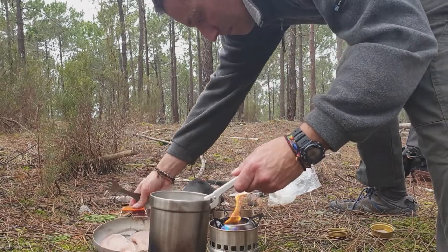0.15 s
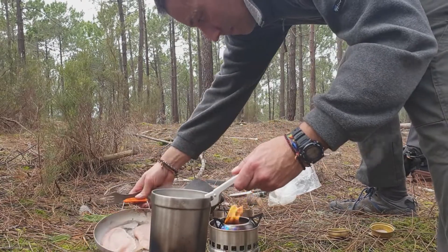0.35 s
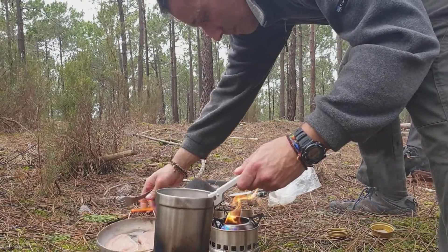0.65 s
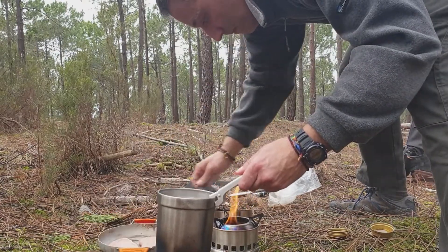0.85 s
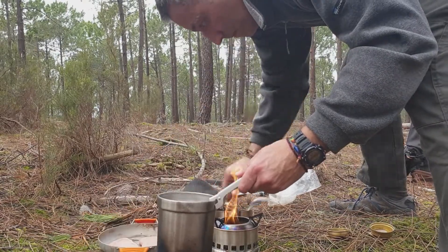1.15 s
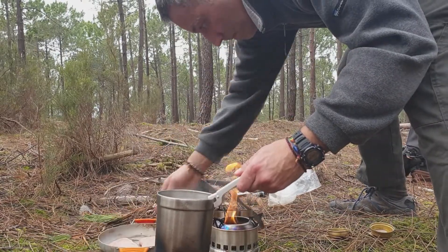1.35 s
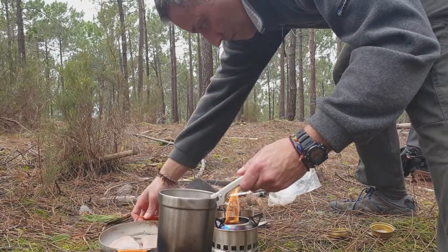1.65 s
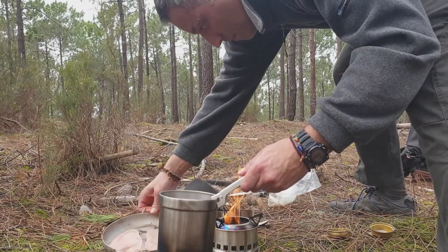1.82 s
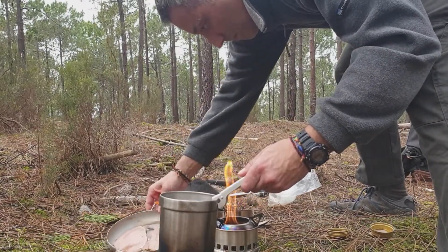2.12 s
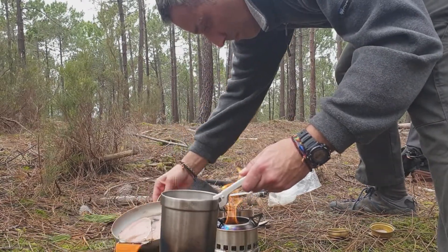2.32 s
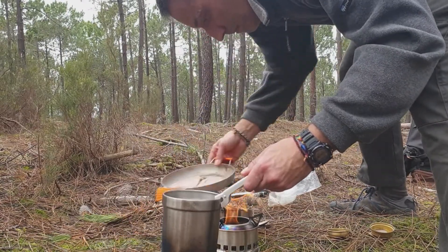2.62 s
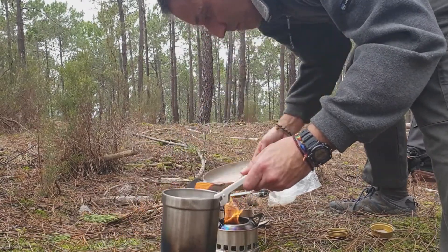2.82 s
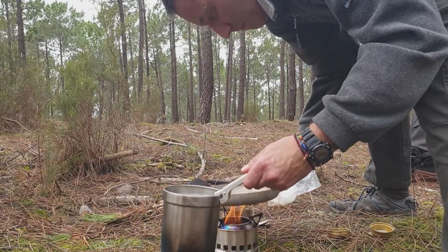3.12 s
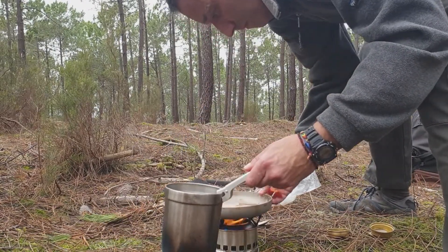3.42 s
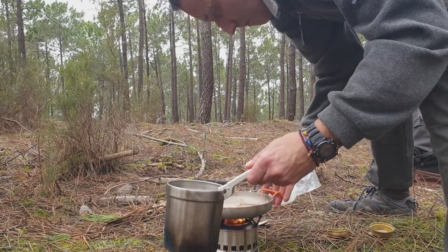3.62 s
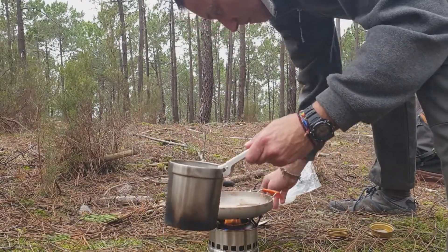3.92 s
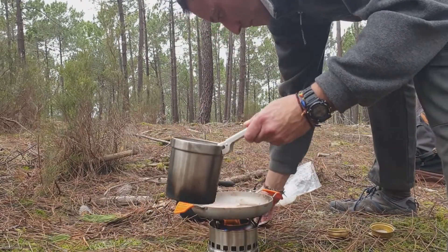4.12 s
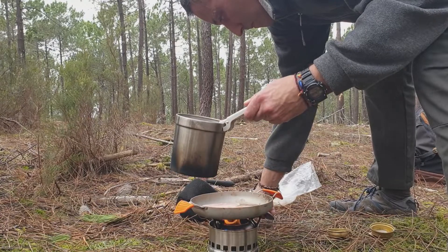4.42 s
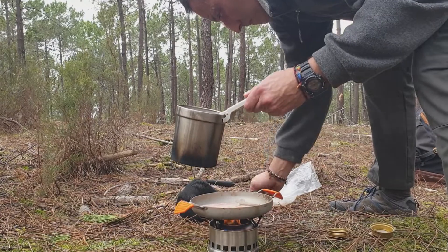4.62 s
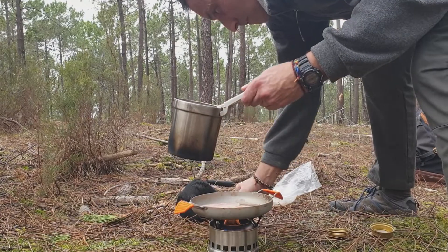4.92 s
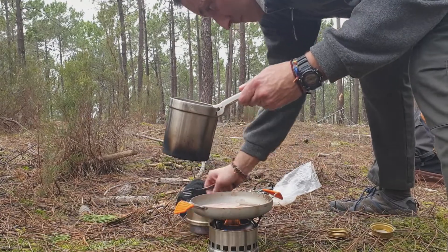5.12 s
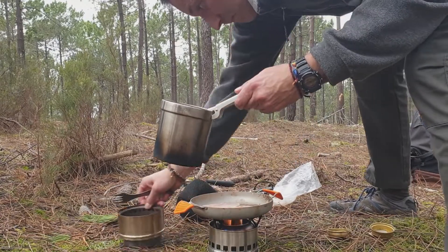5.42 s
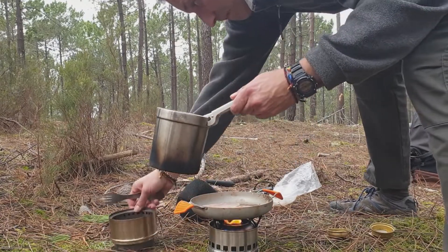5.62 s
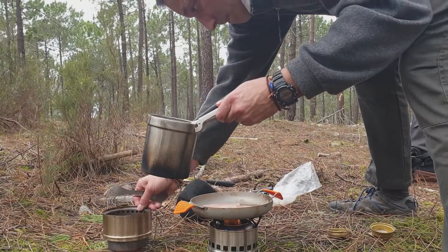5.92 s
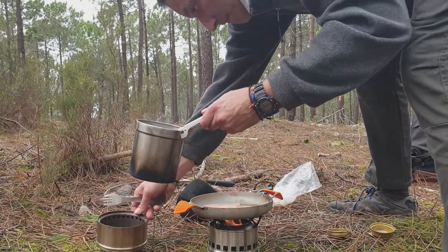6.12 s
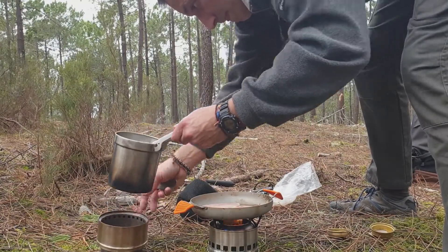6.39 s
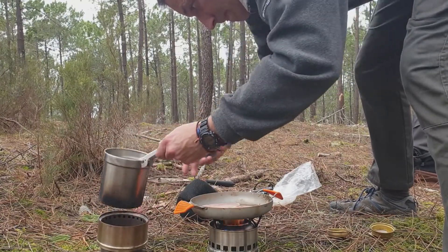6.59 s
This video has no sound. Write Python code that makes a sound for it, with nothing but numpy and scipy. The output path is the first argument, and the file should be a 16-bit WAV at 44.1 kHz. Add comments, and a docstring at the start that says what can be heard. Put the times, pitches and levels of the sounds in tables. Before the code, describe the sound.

Close outdoor stereo pickup of camp cookware being handled. Faint plastic ticks come first, then a sharper click, a bright lid clank with rattling scrape, and a quiet pause. A pan lands on a burner in a quick dry clatter. After another pause, a steel vessel is scraped and struck in the loudest clang, with smaller knocks following. Low wind rumbles throughout, with faint hiss.

```python
"""Thin metal camping ware is handled on a forest floor, a metre from two microphones: a plastic handle ticks,
a lid is set down, a pan lands on the burner, a steel stove shell is dragged and knocked. Each piece rings in
its own decaying modes, driven by single knocks and by noisy grit that rubs and skids. Soft thumps of filtered
noise come through the ground; wind, a low coloured noise, rumbles steadily over the microphones' own hiss."""
import sys
import numpy as np
from scipy import signal
from scipy.fft import rfft, irfft
from scipy.io import wavfile
from scipy.ndimage import uniform_filter1d

SR = 44100
rng = np.random.default_rng(int(sys.argv[2]) if len(sys.argv) > 2 else 0)


def invert_db(level):
    """Linear amplitude ratio for a level in decibels (20 dB per decade), elementwise."""
    return 10 ** (np.asarray(level, dtype=float) / 20)


def store_wav(level_fs):
    """Save 16-bit WAV to argv[1]."""
    pcm = np.round(np.clip(np.atleast_2d(level_fs), -1, 1) * 32767)
    wavfile.write(sys.argv[1], SR, pcm.T.astype(np.int16))


N = 297675  # length in samples
SIDES = np.array([[1], [-1]])  # left, right
TAIL = np.arange(SR // 4) / SR  # time axis of one ring [s]


def at(points, hz):
    """A spectrum read on a log-frequency axis."""
    f, db = np.transpose(points)
    return np.interp(np.log(np.maximum(hz, 1)), np.log(f), db, left=-90, right=-90)


def colour(x, gain):
    """Filter by a gain given as a function of Hz."""
    return irfft(rfft(x) * gain(np.fft.rfftfreq(x.shape[-1], 1 / SR)), x.shape[-1])


def band(x, lo_hz, hi_hz):
    """Causal band-pass."""
    return signal.sosfilt(signal.butter(3, (lo_hz, hi_hz), "bandpass", fs=SR, output="sos"), x)


def unit(x):
    """Scale to rms 1."""
    return x / np.sqrt(np.mean(x ** 2))


def walk(rate):
    """Random levels, a new one each 1 / rate s, smoothed twice into slow slides."""
    hold = int(SR / rate)
    steps = np.repeat(rng.standard_normal(N // hold + 1), hold)
    return 0.95 * uniform_filter1d(uniform_filter1d(steps, hold), hold)[:N]


# spectrum of the wind: (frequency [Hz], relative density [dB per Hz])
WIND = [(11, -60), (18, -25), (25, -2), (37, -5.5), (54, 1), (70, 0.5), (120, -6), (167, -9), (248, -15.5),
        (352, -26.5), (489, -35), (589, -42.5), (695, -44), (2500, -58.5), (3250, -89.5), (5500, -120)]
# the part unlike left and right: (frequency [Hz], level against the shared part [dB])
WIND_UNLIKE = [(25, -20.5), (125, -16), (400, -4.5), (2000, 4.5)]
# slow swell under the flutter: (time [s], level [dB])
GUST = [(0, -47.5), (2.5, -47.5), (3.5, -47), (5, -46), (6.75, -46.5)]


def wind():
    """Low turbulence, nearly the same at both microphones, swelling slowly with a light flutter."""
    same, other = rng.standard_normal((2, N))
    same = colour(same, lambda f: invert_db(at(WIND, f)))
    other = colour(other, lambda f: invert_db(at(WIND, f) + at(WIND_UNLIKE, np.clip(f, 30, 1900))))
    swell_db = np.interp(np.arange(N) / SR, *np.transpose(GUST))
    flutter_db = .8 * walk(6)
    return unit(same + SIDES * other) * invert_db(swell_db + flutter_db)


# spectrum of the hiss: (frequency [Hz], relative density [dB per Hz])
HISS = [(880, -30), (1500, -5), (2290, -10), (3020, -5.5), (6450, -12.5), (7400, -10.5), (8330, -18),
        (11500, -6), (14900, -7), (15800, -12)]


def hiss():
    """Smooth air and electronics noise, unrelated left and right."""
    middle, side = (colour(rng.standard_normal(N), lambda f: invert_db(at(HISS, f))) for _ in range(2))
    return unit(middle + 0.98 * SIDES * side) * invert_db(-81)


def mode_bank(modes, free):
    """One decaying complex turn for each mode; a firmer grip (lower free) shortens them all."""
    hz, db, t60 = np.transpose(modes)[:, :, None]
    return invert_db(db) * np.exp((2j * np.pi * hz - np.log(1000) / (t60 * free)) * TAIL)


def ring(modes, bank, gain_db, spread=0.93):
    """The modes at two microphones; higher ones arrive further out of step."""
    hz = np.transpose(modes)[0]
    skew = spread * np.minimum(hz / 10000, 1) ** 1.2 * rng.standard_normal(len(hz))
    sign = (-1.) ** np.arange(len(hz))  # neighbours start in opposite directions, so no thud lies below them
    return ((sign * invert_db(gain_db) * np.exp(1j * SIDES * skew)) @ bank).imag


def sheen(t60, side_gain):
    """The crowd of upper modes too dense to count: a noise that dies fast, almost unrelated left and right."""
    middle, side = rng.standard_normal((2, len(TAIL)))
    return (middle + side_gain * SIDES * side) * invert_db(-60 * TAIL / t60)


def knocks(modes, table, low_hz, crack_db, crack_t60, chatter_t60=0.0058):
    """Every blow chatters briefly, rings the modes near its favoured pitch most and adds a crack of like colour."""
    out = np.zeros((2, N + SR))
    mode_hz = np.transpose(modes)[0]
    for s, peak_db, spot_hz, free, pan_db in table:
        free = max(free, .03)
        octaves = lambda hz: np.abs(np.log2(np.maximum(hz, 1) / spot_hz))
        off = octaves(mode_hz)
        # a 13 dB lift within some .06 octave of the spot, and 7 dB lost per octave away
        near_db = 13 * np.exp(-(off / .06) ** 2) - 7 * off
        tone = ring(modes, mode_bank(modes, min(free, 1.5)), near_db)

        click = TAIL == 0
        chatter = click + 0.044 * rng.standard_normal(len(TAIL)) * invert_db(-60 * TAIL / chatter_t60)
        tone = signal.fftconvolve(tone, chatter[None], axes=1)[:, :len(TAIL)]

        crack = colour(sheen(crack_t60 * free, 0.89), lambda f: invert_db(-4.5 * octaves(f)))
        crack = band(crack, low_hz, 22000)

        blow = tone / abs(tone).max() + invert_db(crack_db) * crack / abs(crack).max()
        blow = blow * np.cos(np.pi / 2 * TAIL / TAIL[-1])  # fade to silence by the end
        i = int(s * SR)
        out[:, i:i + len(TAIL)] += invert_db(peak_db + SIDES * pan_db / 2) * blow / abs(blow).max()
    return out[:, :N]


# the skid after a knock, by piece: (level against the peak [dB], t60 when free [s],
# fineness at 2 kHz [dB], fineness per octave of the spot [dB])
SKIDS = dict(handle=(-28, 0.33, -8, 10), lid=(-29.5, 0.56, -2, 6.5), pan=(-15, 0.41, 0.5, 12.5),
         shell=(-29.5, 0.05, -9.5, 26))


def skids(table, name):
    """After each knock the piece skids to rest, longer when loosely held, finer when struck at a bright spot."""
    under_db, t60, fine_db, per_octave_db = SKIDS[name]
    strokes = []
    for s, peak_db, spot_hz, free, _ in table:
        finest_db = fine_db + per_octave_db * np.log2(spot_hz / 2000)
        start_db = peak_db + under_db - max(finest_db, 0)
        strokes.append([(s, start_db, finest_db), (s + t60 * free, start_db - 60, finest_db)])
    return strokes


# edges of the pitch ranges that the grades of grit drive, by piece: (frequency [Hz], ..)
RUB_EDGES = dict(handle=(600, 3000, 7500, 16000), lid=(550, 1000, 1600, 3000, 7500, 16000),
             pan=(700, 2500, 4500, 8000, 16000), shell=(600, 1600, 2300, 3100, 7500, 16000))
# grades of grit, coarse to fine, by piece: (level [dB], share of the fineness taken up [0-1])
GRADES = dict(handle=[(-0.5, 0), (-3, 0.77), (1, 0.88)], lid=[(-19.5, 0.48), (-14.5, 0.7), (-5, 0.067),
          (-0.5, 0.42), (0.5, 1)], pan=[(-4.5, 0), (-7, 0.073), (0.5, 0.56), (-1.5, 0.88)],
          shell=[(-16, 0.18), (-4.5, 0), (-5.5, 0.47), (0, .6), (3, 1)])


def rubbing(modes, strokes, name, sheen_db, sheen_t60, free, pan_db,
            grain_db=2.0, shift_db=10.0, dwell_s=.03, patchy_db=2.0):
    """Grades of grit drive the modes and the sheen; the contact slides, so their balance keeps changing."""
    rows, edges = np.concatenate(strokes), RUB_EDGES[name]
    first, last = int(rows[:, 0].min() * SR), int(rows[:, 0].max() * SR)
    length = last - first

    force = np.zeros((len(sheen_db), length))
    for stroke in strokes:
        s, coarse_db, finest_db = np.transpose(stroke)
        span = np.arange(int(s[0] * SR), int(s[-1] * SR))
        for k, (db, share) in enumerate(GRADES[name]):
            force[k, span - first] += invert_db(np.interp(span / SR, s, coarse_db + db + share * finest_db))
    force *= [invert_db(patchy_db * walk(70)[:length]) for _ in force]
    grains = rng.standard_normal(force.shape) * invert_db(grain_db * rng.standard_normal(force.shape))
    force *= unit(grains)

    hop = int(dwell_s * SR)
    out, bank = np.zeros((2, length + SR)), mode_bank(modes, free)
    force = np.pad(force, ((0, 0), (hop, 2 * hop)))
    window = np.sin(np.pi * np.arange(2 * hop) / (2 * hop))
    for i in range(0, length + hop, hop):
        piece = force[:, i:i + 2 * hop] * window
        if not piece.any():
            continue
        tone = unit(ring(modes, bank, shift_db * rng.standard_normal(len(modes))))
        crowd = unit(sheen(sheen_t60, 1.0))
        for k, grit in enumerate(piece):
            # each band has its own balance of sheen to modes
            part = band(tone + invert_db(sheen_db[k]) * crowd, edges[k], edges[k + 1])
            part = part / np.sqrt((part ** 2).sum() / 2)
            sound = signal.fftconvolve(part, grit[None], axes=1)
            out[:, i:i + sound.shape[1]] += sound
    return np.pad(out[:, hop:], ((0, 0), (first, N)))[:, :N] * invert_db(SIDES * pan_db / 2)


# modes of the handle: (frequency [Hz], relative level [dB], t60 when free [s])
HANDLE = [(550, 1, 0.069), (854, -2, .04), (1560, -7, 0.066), (2230, -1, 0.012), (4800, -8, 0.019),
          (7240, -9, 0.012), (11200, -14, 0.031)]
# ticks: (time [s], peak level [dB], favoured pitch [Hz], share of free ring time [ratio], left minus right [dB])
HANDLE_KNOCKS = [(0.0288, -50.5, 5540, 0.46, 0.5), (0.04, -56, 4820, .4, 0), (0.074, -60, 7000, .4, 0),
                 (0.0583, -55.5, 7980, 0.63, -1.0), (0.377, -57, 2920, 0.49, -1.7),
                 (0.704, -45.5, 11800, 0.56, 2.0), (0.7412, -32.5, 12000, 0.23, 1.0)]
# one table per stretch of contact: (time [s], coarse grit level [dB], fineness, finest grit over it [dB])
HANDLE_DRAGS = [
    [(0.68, -77, -5), (0.702, -78, 12), (0.726, -76, 7), (0.742, -55, -19), (0.762, -72.5, -6),
     (0.886, -94, 13.5), (0.9, -90, -6)],
]


def handle():
    """A plastic handle ticks and scrapes: few modes, mostly very short."""
    struck = knocks(HANDLE, HANDLE_KNOCKS, low_hz=820.0, crack_db=3.4, crack_t60=0.034)
    strokes = HANDLE_DRAGS + skids(HANDLE_KNOCKS, "handle")
    return struck + rubbing(HANDLE, strokes, "handle", sheen_db=(3., 5., 8.),
                            sheen_t60=0.0064, free=0.79, pan_db=2.6)


# soft thumps through the ground: (time [s], peak level [dB], top frequency [Hz], t60 [s])
THUMPS = [(.342, -47, 450, .03), (.743, -54, 900, .05), (1.169, -44, 650, .12), (5.144, -43, 1100, .1),
          (5.804, -49, 1100, .05)]


def thump():
    """Dull, damped pushes through the needles: short bursts of low noise."""
    out = np.zeros(N + SR)
    for s, peak_db, top_hz, t60 in THUMPS:
        push = band(rng.standard_normal(len(TAIL)) * invert_db(-60 * TAIL / t60), 160, top_hz)
        i = int(s * SR)
        out[i:i + len(TAIL)] += invert_db(peak_db) * push / abs(push).max()
    return out[:N]


# modes of the lid: (frequency [Hz], relative level [dB], t60 when free [s])
LID = [(700, -20, .7), (1378, -16, .4), (1980, -6, .15), (2121, 0, .2), (2853, -12, .15), (3268, -14, .2),
       (3635, -10, .2), (3903, -15, .2), (4301, -8, .15), (5154, -12, .2), (5500, -5, .3), (6202, -17, .35),
       (6993, -15, .4), (7666, -16, .15), (8220, -18, .15), (8969, -17, .1), (9717, -15, .2),
       (10100, -17, .15), (11280, -18, .12), (11970, -17, .12), (12890, -16, .12), (13350, -16, .15),
       (14300, -18, .1)]
# knocks: (time [s], peak level [dB], favoured pitch [Hz], share of free ring time [ratio], left minus right [dB])
LID_KNOCKS = [(1.1395, -36, 1960, 0.4, -1.5), (1.1689, -24, 2280, 0.6, -2), (1.2155, -36, 2140, 0.6, -1),
              (1.2647, -28, 12000, 0.35, -6), (1.305, -46.5, 700, 0.72, 2), (1.4921, -43.5, 12800, 0.02, 0),
              (1.525, -54, 9900, 0.2, -14), (1.5494, -49, 13300, 0.22, 5.5),
              (1.5694, -57.5, 7000, 0.48, -8)]
# one table per stretch of contact: (time [s], coarse grit level [dB], fineness, finest grit over it [dB])
LID_DRAGS = [
    [(1.139, -48.5, 10), (1.165, -44.5, -12), (1.171, -49, 8), (1.193, -48.5, 2), (1.231, -38, -8.5),
     (1.255, -50, 2), (1.262, -50, -5)],
    [(1.268, -48, 6), (1.282, -50, 1), (1.294, -45.5, -3), (1.304, -54, 5), (1.398, -74, 4.5),
     (1.464, -85.5, 12), (1.49, -86, 8)],
    [(1.493, -86, 7), (1.535, -86, 27), (1.545, -88, 9), (1.623, -97, 12), (1.655, -87, -1),
     (1.671, -98, 16), (1.72, -90, 7)],
]


def lid():
    """A thin lid is set down: many long modes up into the treble, knocked and rubbed."""
    struck = knocks(LID, LID_KNOCKS, low_hz=1100., crack_db=3.5, crack_t60=0.15)
    strokes = LID_DRAGS + skids(LID_KNOCKS, "lid")
    return struck + rubbing(LID, strokes, "lid", sheen_db=(-7.5, -10.5, -1.0, 3.0, -0.5),
                            sheen_t60=0.0151, free=.25, pan_db=1.5)


# modes of the pan: (frequency [Hz], relative level [dB], t60 when free [s])
PAN = [(1060, -4, .06), (1480, -3, .04), (2010, -2, .04), (2900, -8, .03), (3400, -9, .03), (4170, -9, .03),
       (5800, -12, .02), (7000, -13, .02), (7920, -13, .02), (10900, -16, .02), (13300, -15, .02)]
# knocks: (time [s], peak level [dB], favoured pitch [Hz], share of free ring time [ratio], left minus right [dB])
PAN_KNOCKS = [(3.32, -33.5, 1580, 0.24, -2), (3.345, -32.5, 2140, 0.33, 1), (3.368, -35, 1060, 0.62, 2),
              (3.391, -40.5, 1000, 0.26, 0), (3.418, -73, 1080, 0.38, 2), (3.51, -46, 1970, 0.33, -0.5)]


def pan():
    """A pan lands on the burner: heavily damped modes, each knock ending in a skid."""
    struck = knocks(PAN, PAN_KNOCKS, low_hz=680.0, crack_db=4.4, crack_t60=0.059)
    return struck + rubbing(PAN, skids(PAN_KNOCKS, "pan"), "pan", sheen_db=(7.7, 12.5, 14., 13.0),
                            sheen_t60=0.007, free=0.3, pan_db=-1.3)


# modes of the steel shell: (frequency [Hz], relative level [dB], t60 when free [s])
SHELL = [(1365, -21, .5), (1800, -19, .1), (1972, -6, .2), (2076, -1, .2), (2140, 0, .22), (2465, -13, .12),
         (2523, -11, .15), (2645, -9, .45), (2720, -12, .12), (2939, -14, .1), (3277, -13, .15),
         (3424, -15, .2), (3865, -13, .18), (3912, -13, .18), (4465, -13, .15), (4800, -16, .1),
         (5118, -14, .18), (5275, -12, .15), (5478, -13, .15), (6090, -13, .12), (6305, -12, .15),
         (6970, -16, .1), (7600, -17, .08), (8161, -18, .08), (9200, -18, .07), (10690, -16, .07),
         (11450, -18, .06), (12250, -17, .07), (13400, -19, .06), (14500, -18, .06)]
# knocks: (time [s], peak level [dB], favoured pitch [Hz], share of free ring time [ratio], left minus right [dB])
SHELL_KNOCKS = [(4.505, -66.5, 11500, 0.41, -15), (4.816, -44, 2190, 0.5, 1), (4.844, -42, 2160, 0.46, -3),
                (4.974, -53, 2140, .55, -4), (5.143, -19, 2090, 0.27, -1.5), (5.155, -27, 6300, 1.4, -2),
                (5.175, -23.5, 2220, 0.38, 7), (5.177, -28.5, 1380, 0.44, -4),
                (5.2902, -24, 10560, 0.79, 2), (5.675, -57, 2600, 0.78, 0), (5.803, -26, 2702, 0.17, 5.5),
                (5.989, -35.5, 4465, 1.1, 0), (6.017, -32, 12250, 0.52, -10), (6.053, -57, 2700, 1.4, 7.5)]
# a finger's light first touch: (time [s], coarse grit level [dB], fineness, finest grit over it [dB])
SHELL_BRUSH = [
    [(4.42, -100, 11), (4.5, -96, 13.4), (4.6, -93.5, 13), (4.72, -104, 8)],
]
# one table per stretch of contact: (time [s], coarse grit level [dB], fineness, finest grit over it [dB])
SHELL_DRAGS = [
    [(4.82, -50.5, -3), (4.832, -64, -11), (4.858, -44, -15.5), (4.902, -53, -12), (4.908, -64, -11),
     (4.962, -72, 2.5), (4.97, -65, -5)],
    [(4.976, -60, -13), (4.982, -58.5, -11), (5.048, -52.5, -7), (5.062, -54.5, -4.5), (5.1, -38.5, -7.5),
     (5.112, -48.5, 4), (5.136, -57, 12)],
    [(5.144, -30, -5), (5.15, -31, -2.5), (5.16, -29.5, -10.5), (5.176, -28.5, -7), (5.222, -40, -0.5),
     (5.258, -44.5, -6.5), (5.286, -45, -9)],
    [(5.292, -60, 23.5), (5.328, -64, 9.5), (5.364, -49.5, 1), (5.43, -48, 1), (5.458, -58.5, 5),
     (5.526, -56, 0.5), (5.66, -92, 0.5)],
    [(5.672, -64, -5), (5.676, -70, 1.5), (5.734, -67.5, -6), (5.744, -73.5, -2.5), (5.794, -73.5, 10)],
    [(5.806, -41, -16), (5.854, -58.5, -7.5), (5.898, -61.5, -3.5), (5.92, -48, -18), (5.934, -65, -1),
     (5.942, -54.5, -12.5), (5.985, -64.5, 1.5)],
    [(5.99, -59, 10.5), (6.004, -61.5, 0.5), (6.022, -45, 3.5), (6.032, -61, 4), (6.044, -60.5, 2.5),
     (6.154, -78.5, -5.5), (6.32, -99, 1)],
]


def shell():
    """A steel stove shell is brushed, dragged and knocked: dense modes, strongest near 2 kHz."""
    struck = knocks(SHELL, SHELL_KNOCKS, low_hz=800.0, crack_db=-2.0, crack_t60=0.085)
    strokes = SHELL_BRUSH + SHELL_DRAGS + skids(SHELL_KNOCKS, "shell")
    return struck + rubbing(SHELL, strokes, "shell", sheen_db=(-15.0, -10.0, -4.5, 6.0, 2.0),
                            sheen_t60=0.017, free=0.26, pan_db=.6)


def scene():
    """A plastic handle and three pieces of metal, with ground thumps, over wind and hiss."""
    return wind() + hiss() + handle() + thump() + lid() + pan() + shell()


def roll_off(x):
    """The treble ends steeply here."""
    return signal.sosfilt(signal.butter(12, 16600, fs=SR, output="sos"), x)


def record(dry):
    """The right microphone is a little more sensitive; both lose the deepest bass and the very top."""
    low_cut_hz, top_hz, right_gain_db = 39, 15650, 1.82
    x = signal.sosfilt(signal.butter(4, low_cut_hz, "highpass", fs=SR, output="sos"), dry)
    x = signal.sosfilt(signal.ellip(8, .2, 60, top_hz, fs=SR, output="sos"), x)
    mix = x * invert_db(-SIDES * right_gain_db / 2)
    return roll_off(mix)


dry = scene()
out = record(dry)
store_wav(out)
```